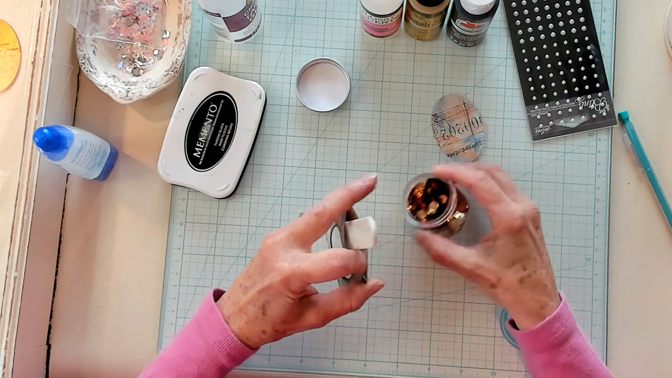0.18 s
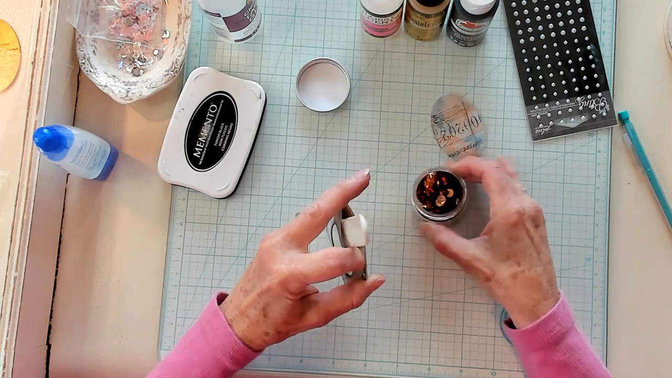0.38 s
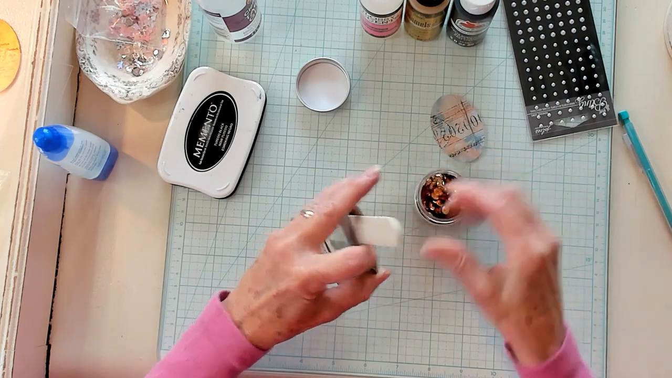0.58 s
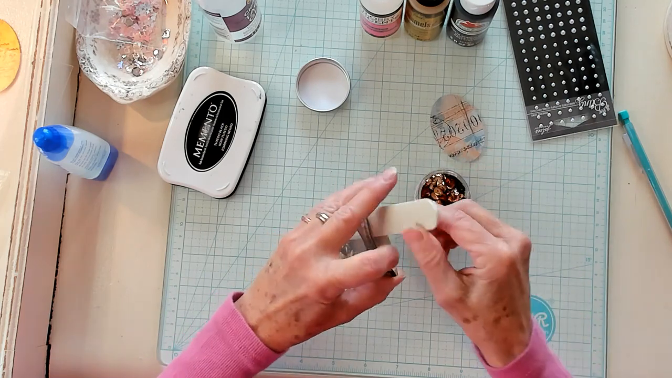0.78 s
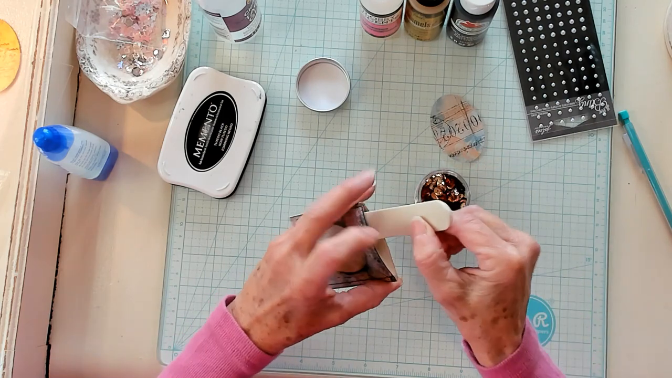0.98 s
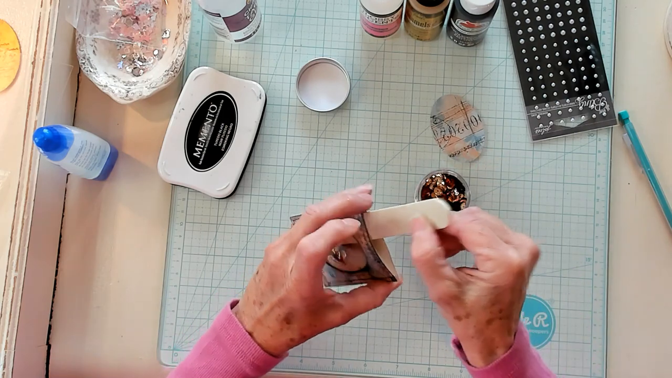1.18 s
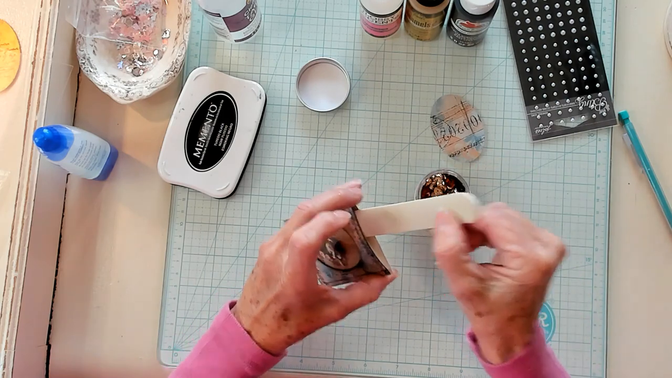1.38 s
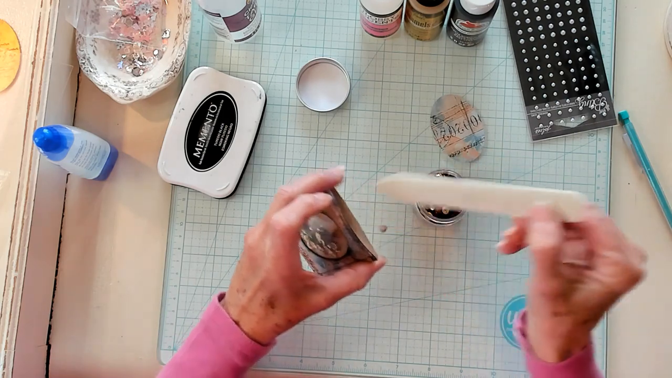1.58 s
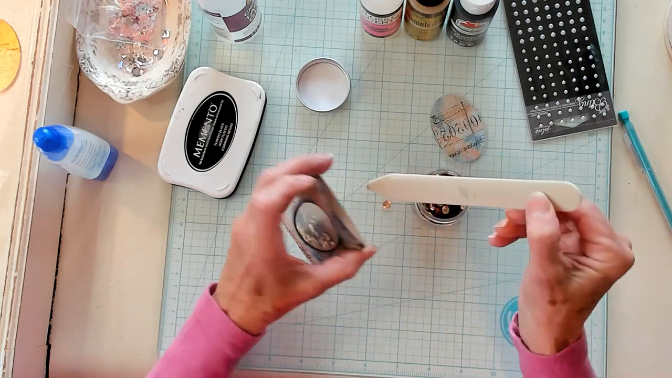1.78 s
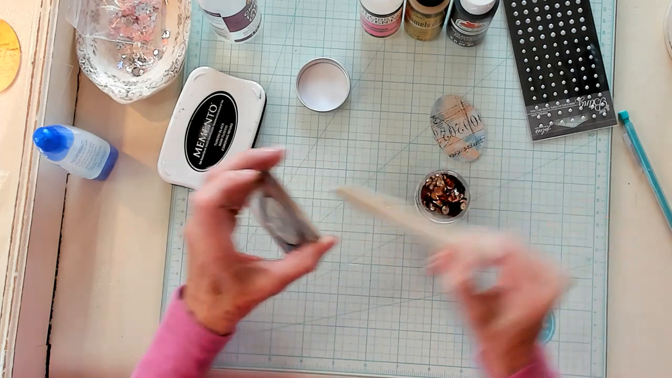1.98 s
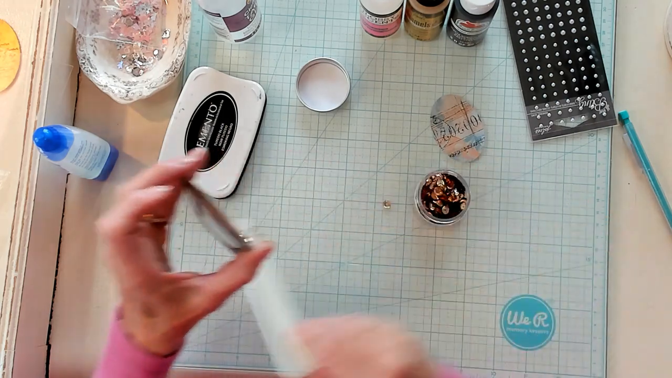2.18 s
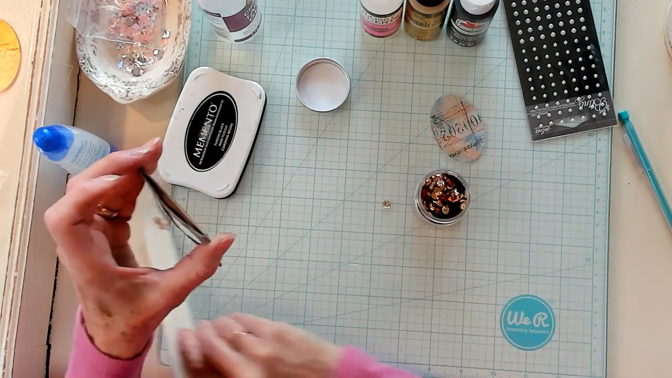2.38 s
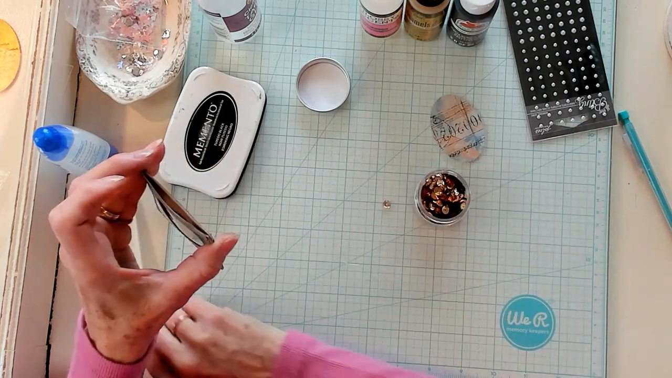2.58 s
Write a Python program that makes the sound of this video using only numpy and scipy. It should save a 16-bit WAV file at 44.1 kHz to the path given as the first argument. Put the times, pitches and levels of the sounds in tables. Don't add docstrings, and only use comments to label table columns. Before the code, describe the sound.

A small glass jar of sequins knocks twice on a matted table, then a bone folder clicks and scrapes out of a stiff paper pocket and drops, clattering flat. Small dry room, faint hum, close microphone.

```python
import sys
import numpy as np
from scipy import signal
from scipy.fft import rfft, irfft, dct
from scipy.io import wavfile
from scipy.ndimage import uniform_filter1d

SR = 44100
rng = np.random.default_rng(int(sys.argv[2]) if len(sys.argv) > 2 else 0)


def invert_db(level):
    return 10 ** (np.asarray(level, dtype=float) / 20)


def unload_wav(signal):
    wavfile.write(
        sys.argv[1],
        SR,
        np.round(np.clip(np.atleast_2d(signal).T, -1, 1) * 32767).astype(np.int16),
    )


N = 114660
T = np.arange(N) / SR
SIZE = 16384
STRIKE_T = np.arange(SIZE) / SR


def unit(x):
    return x / np.sqrt(np.mean(x ** 2))


def curve(rows):
    s, db = np.array(rows).T
    return invert_db(np.interp(T, s, db, left=-150, right=-150))


def colour(x, points):
    hz, db = np.array(points).T
    f = np.fft.rfftfreq(len(x), 1 / SR) + 1
    gain = invert_db(np.interp(np.log(f), np.log(hz), db))
    return irfft(rfft(x) * gain, len(x))


def reson(x, hz, width):
    return signal.lfilter(*signal.iirpeak(min(hz, .45 * SR), hz / width, SR), x)


def bank(x, peaks):
    return unit(sum(invert_db(db) * unit(reson(x, hz, width)) for hz, width, db in peaks))


def high_pass(x, order, hz):
    return signal.sosfilt(signal.butter(order, hz, "high", fs=SR, output="sos"), x)


def add(out, s, x):
    i = int(s * SR)
    out[i:i + len(x)] += x[:N - i]


def fade(t60):
    push_s = 0.00048
    return invert_db(-60 * STRIKE_T / t60) * (1 - np.exp(-STRIKE_T / push_s))


def ring(hz, db, t60, blur=1):
    beat_hz, longest_t60_s = 44.6, .2
    out = 0
    for f, d, r, c in zip(hz, db, t60, rng.standard_normal((len(hz), 3, 2))):
        wobble = sum(np.sign(b) * np.sin(np.pi * beat_hz * (1 + abs(a)) * STRIKE_T) for a, b in c[1:])
        beat = 1 + blur * wobble / 2
        tone = np.sin(2 * np.pi * f * STRIKE_T) * fade(min(r, longest_t60_s))
        out = out + np.sign(c[0, 0]) * invert_db(d) * beat * tone
    return out / 2


def wash(points, low_s, high_s):
    x = unit(colour(rng.standard_normal(SIZE), points))
    low = signal.lfilter(*signal.butter(2, 2000, fs=SR), x)
    return low * fade(low_s) + (x - low) * fade(high_s)


# pitch_hz, level_db
AIR_COLOUR = [(30, -39.5), (80, -27), (145, -2.5), (290, -7.5), (450, -11), (1000, -13.5), (3000, -20.5),
              (16000, -35)]
# pitch_hz, width_hz, level_db
HUM = [(139.55, 13, -82), (230, 21, -78.5)]
# time_s, level_db
HUM_SWELL = [(0, 3.5), (.9, 3.5), (1.3, 3), (2.0, -8.5), (2.6, -1)]


def air():
    hiss = invert_db(-69) * unit(colour(rng.standard_normal(N), AIR_COLOUR))
    hum = sum(invert_db(db) * unit(reson(rng.standard_normal(N), hz, width)) for hz, width, db in HUM)
    return hiss + hum * curve(HUM_SWELL)


def slips():
    slips_per_s, scatter_db, rub_db = 3100, 4, 1
    chance = rng.random((2, N))
    happens = chance[0] < slips_per_s / SR
    size = invert_db(-scatter_db * np.log(chance[1] + .02))
    sign = np.sign(chance[1] * 13000.0 % 1 - .5)
    return unit(happens * size * sign) + invert_db(rub_db) * rng.standard_normal(N)


# time_s, level_db
RIM = [(0.0, -90), (0.026, -61), (0.046, -53), (0.13, -81)]


def rim():
    hz, width_hz = 1546, 390
    return unit(reson(reson(slips(), hz, width_hz), hz, width_hz)) * curve(RIM)


# time_s, level_db
FLAP = [(1.545, -73), (1.551, -49), (1.62, -72), (1.68, -72), (1.74, -81)]
# pitch_hz, width_hz, level_db
FLAP_TONES = [(6150, 53, -5), (5380, 110, -7), (2880, 140, -4.5)]


def flap():
    return bank(slips(), FLAP_TONES) * curve(FLAP)


# time_s, level_db
MOUTH = [(.97, -70), (1.0, -57), (1.07, -70.5), (1.085, -62), (1.13, -41), (1.162, -45), (1.19, -47.5),
         (1.3, -65), (1.4, -73.5)]


def mouth():
    return bank(slips(), [(3800, 170, 0)]) * curve(MOUTH)


# time_s, level_db
SETTLE = [(2.36, -52), (2.412, -58), (2.436, -53.5), (2.452, -58), (2.53, -58), (2.538, -50), (2.6, -72)]
# pitch_hz, width_hz, level_db
HOLLOW = [(632, 68, -0.5), (1150, 110, -1.5), (1968, 180, -6), (3000, 160, -7.5)]


def settle():
    return bank(slips(), HOLLOW) * curve(SETTLE)


# pitch_hz, width_hz, level_db
POCKET = [(2100, 250, -4), (3700, 500, -9.5), (5330, 400, -8.5), (6280, 900, -4.5), (7340, 400, -3)]


def cavity(x):
    return sum(invert_db(db) * reson(x, hz, width) for hz, width, db in POCKET)


# time_s, level_db
SCRAPE = [(1.07, -73), (1.106, -44.5), (1.16, -40), (1.2, -41), (1.33, -57.5), (1.364, -52), (1.452, -64),
          (1.48, -65)]
# time_s, level_db
FUMBLE = [(.62, -62), (.672, -58), (.69, -41.5), (.75, -57.5), (.8, -79.5), (.9, -66), (1.0, -64),
          (1.075, -72)]
# time_s, level_db
SHIFT = [(0.0, -103), (0.01, -68.5), (0.06, -55.5), (0.136, -74), (0.142, -86), (0.222, -71), (0.23, -73)]
# time_s, level_db
WITHDRAW = [(1.44, -82), (1.468, -67), (1.475, -58), (1.515, -50), (1.56, -57.5), (1.62, -64.5),
            (1.744, -87)]
# pitch_hz, level_db
SCRAPE_COLOUR = [(290, -55), (500, -26.5), (1420, -9.5), (2190, -5.5), (3060, -10), (3810, 1), (4470, 0.5),
                 (6140, -4), (16000, -20)]


def scrape():
    x = slips()
    x = unit(unit(colour(x, SCRAPE_COLOUR)) + invert_db(-6.5) * unit(cavity(x)))
    grain = np.repeat(rng.standard_normal(N // 200 + 1), 200)
    grain_db = 3.0 * uniform_filter1d(grain, size=150)[:N]
    x = unit(x * invert_db(grain_db))
    thin = high_pass(x, 4, 2100)
    return x * (curve(SCRAPE) + curve(FUMBLE) + curve(SHIFT)) + thin * curve(WITHDRAW)


# start_s, level_db (peak), pitch_hz, tail_db (room)
TICKS = [(.0104, -62, 4120, -9), (0.1457, -47.5, 8900, -16.5), (0.448, -32, 11000, -23),
         (0.464, -36, 10300, -20.5), (0.6249, -31.5, 6730, -28), (0.6743, -30.5, 5800, -19),
         (0.684, -23.5, 7200, -31), (.7632, -45, 1920, -14.5), (.8474, -22, 1763, -13),
         (0.8667, -22.5, 3760, -18), (0.8812, -37, 5670, -43), (0.882, -32.5, 3060, -17),
         (0.9583, -38, 3130, -21), (0.9787, -28, 3660, -19), (1.1019, -35.5, 1900, -15),
         (1.1233, -31.5, 2100, -14), (1.1284, -29, 2340, -19), (1.2181, -29.5, 5800, -30),
         (1.2346, -31.5, 5520, -16), (1.2564, -34, 6540, -22.5), (1.3982, -44.5, 3880, -16),
         (1.4731, -41, 3770, -11.5), (1.5021, -31, 3650, -21), (1.5139, -34, 3920, -17),
         (1.5459, -32, 6150, -30), (1.4815, -50, 3000, -33), (1.4922, -41, 3960, -20),
         (1.5201, -36, 2330, -30), (1.535, -41, 3480, -20), (1.5828, -40.5, 6240, -28),
         (2.0133, -37, 5300, -20.5), (.6868, -29, 5000, -25), (1.4406, -54, 6300, -17),
         (1.0815, -50.5, 3570, -24), (1.135, -28, 3700, -14), (1.1495, -34.5, 5160, -20),
         (1.1597, -25.5, 3870, -15.5), (1.165, -21.5, 5100, -17.5), (1.1885, -46, 7300, -25),
         (1.2045, -36, 5800, -31), (1.2423, -41, 6000, -28), (1.2532, -45, 4540, -26),
         (1.4712, -47, 3780, -24), (1.5048, -45, 5200, -20), (1.5178, -29, 6300, -26),
         (1.5225, -48, 3920, -23), (1.5298, -45, 5000, -29), (1.5415, -41, 2290, -33),
         (1.5512, -43.5, 2930, -16)]
# pitch_hz, level_db
TICK_COLOUR = [(300, -50.5), (900, -10), (1640, -2), (2790, -4), (3760, -4.5), (5000, -7), (7440, -5.5),
               (16000, -12.5)]


def ticks():
    lean_db, snap_share = 6.5, 0.058
    crack_db, crack_t60_s, pocket_db, thump_db = -4.5, .011, -0.5, -15.5
    out = np.zeros(N)
    for s, db, hz, tail_db in TICKS:
        lean = [(f, d - lean_db * abs(np.log2(f / hz))) for f, d in TICK_COLOUR]
        snap = np.sin(2 * np.pi * hz * STRIKE_T) * fade(2.5 / (hz * snap_share))
        crack = unit(colour(rng.standard_normal(SIZE), lean))
        crack = crack * invert_db(crack_db - 60 * STRIKE_T / crack_t60_s)
        tail = wash(lean, 0.16, .17)
        tail = tail + invert_db(pocket_db) * cavity(tail)
        add(out, s, invert_db(db) * (snap + crack + invert_db(tail_db) * tail))
    high = high_pass(out, 3, 1300)
    thump = reson(np.abs(high), 330, 620)
    return high + invert_db(thump_db) * signal.lfilter(*signal.butter(1, 30, "high", fs=SR), thump)


# start_s, level_db, end_struck (0 low to 1 high)
DROPS = [
    (2.2415, -27.5, .1),
    (2.2885, -26.5, 1),
    (2.2908, -23, 1),
    (2.2975, -24, 0.95),
    (2.3062, -25, 0.64),
    (2.318, -25, 0.71),
    (2.33, -33.5, 0.66),
    (2.5345, -43, 0.82),
]
# pitch_hz, low_end_db, high_end_db, t60_s
FOLDER = [(515, 0.5, -16, 0.25), (581.3, -9.5, -13.5, 0.25), (691, -3.5, -19, 0.26),
          (1186, -2.5, -21, 0.082), (1737, -3.5, -1.5, 0.096), (2022, -8, -5, 0.16),
          (2390, -11, -19, 0.095), (2790, -10, -1, 0.18), (2930, -14, 1, 0.12), (3077, -11, -1, 0.078),
          (3700, -27, -7, 0.21), (4450, -25, -15, 0.26), (4745, -30, -12.5, 0.2), (6150, -20, -13, 0.15)]
# pitch_hz, level_db
DROP_COLOUR = [(100, -25), (300, -21.5), (620, -10.5), (1230, -10.5), (1800, -3), (3000, 0.5), (6000, -15),
               (16000, -31)]


def drops():
    low_end_damp = 0.68
    out = np.zeros(N)
    hz, low, high, t60 = np.array(FOLDER).T
    for s, db, end in DROPS:
        noise = wash(DROP_COLOUR, 0.29, 0.17) * invert_db(-3.5 - 10.7 * (1 - end))
        slap = invert_db(-1) * ring([2925, 1900, 6150], [0, 0, -6], [0.019] * 3)
        damp = np.where(hz > 1500, low_end_damp + (1 - low_end_damp) * end, 1)
        tones = ring(hz, low + end * (high - low), t60 * damp)
        add(out, s, invert_db(db) * (tones + noise + slap))
    return out


# start_s, level_db, brightness_db (per octave), contact (0 edge to 1 flat)
JAR_HITS = [
    (.2357, -13.5, -2, 0),
    (0.2442, -19.5, -6.5, 0.18),
    (.2555, -21.5, -7.5, 0),
    (0.3587, -29, -4.5, 1),
    (0.3628, -7, -0.5, 0.96),
]
# pitch_hz, edge_db, flat_db, t60_s
JAR = [(330.3, -18, -18.5, 0.17), (462, -17.5, -18, .18), (555, -5.5, -16, 0.33), (622, -14, -10, 0.19),
       (702.3, 1.5, -6, 0.093), (790, -8.5, -19.5, 0.24), (906, 0.5, 2, .16), (995, -7, -9.5, .12),
       (1070, -8.5, -13, 0.12), (1148, -4.5, -18.5, 0.13), (1225, -6, -16.5, 0.18),
       (1372, -15, -17.5, 0.11), (1590, -21, -15.5, .16), (1900, -21.5, -17, 0.13)]
# pitch_hz, level_db
JAR_COLOUR = [(100, -49.5), (250, -16.5), (400, -15), (650, -6.5), (1000, -4.5), (1600, -12.5),
              (3000, -18.5), (5000, -26.5), (16000, -38)]
# start_s, pitch_hz, level_db, t60_s
JUMPS = [(0.245, 2330, -21, .03), (.3635, 3200, -19, .015), (0.3641, 1900, -19, .02),
         (0.374, 2940, -23, .045)]


def jar():
    blur = .22
    out = np.zeros(N)
    hz, edge, whole, t60 = np.array(JAR).T
    for s, db, tilt_db, flat in JAR_HITS:
        noise = wash(JAR_COLOUR, 0.24, 0.21)
        noise = colour(noise, [(2000, 0.025), (16000, 3 * tilt_db)])
        tones = ring(hz, edge + flat * (whole - edge), t60, blur)
        table = ring([190, 70], [0, -12], [.25, .2])
        add(out, s, invert_db(db) * (tones + invert_db(-12.5) * noise + invert_db(-26.5) * table))
    for s, f, db, r in JUMPS:
        add(out, s, ring([f], [db], [r], blur))
    return out


def scene():
    knocks = high_pass(jar(), 2, 120)
    background = air() + rim() + flap() + mouth() + settle()
    return (background + scrape() + ticks() + drops() + knocks)[None]


# centre_s, keep_above (times the nearby level), gain
THIN_MOMENTS = [(.123, 2.2, 1.6), (1.174, 1.3, 1.8)]
# pitch_hz, level_db (over the nearby level)
SURVIVORS = [(291, 14), (1390, 16.5), (2190, 11), (2730, 18), (8330, 13), (9880, 8), (10700, 7), (11000, 7),
             (13100, 18), (13600, 8)]
# low_hz, high_hz
RICH_HZ = (3200, 8000)


def thin_out(x, size=2048):
    x = x.copy()
    window = 1.45 * np.sin(np.pi * (np.arange(size) + .5) / size) ** 2 - .25
    window = np.clip(window, 0, 1) ** .5
    hz = (np.arange(size) + .5) * SR / 2 / size
    for s, keep, gain in THIN_MOMENTS:
        part = slice(int(s * SR) - size // 2, int(s * SR) + size // 2)
        lines = dct(window * x[0, part], type=4, norm="ortho")
        local = np.sqrt(uniform_filter1d(lines ** 2, size=41))
        strong = np.abs(lines) > keep * local
        kept = gain * lines * strong * (hz > RICH_HZ[0]) * (hz < RICH_HZ[1])
        for f, db in SURVIVORS:
            near = np.abs(hz - f) < SR / 2 / size
            kept[near] = (invert_db(db) * local * np.sign(lines))[near]
        x[0, part] += window * (dct(kept, type=4, norm="ortho") - window * x[0, part])
    return x


def band_limit(x):
    return signal.sosfilt(signal.butter(12, 16800, fs=SR, output="sos"), x)


def record(dry):
    treble_cut = signal.ellip(8, .2, 50, 16000, fs=SR, output="sos")
    mix = signal.sosfilt(treble_cut, thin_out(dry))
    return band_limit(mix)


dry = scene()
out = record(dry)
unload_wav(out)
```